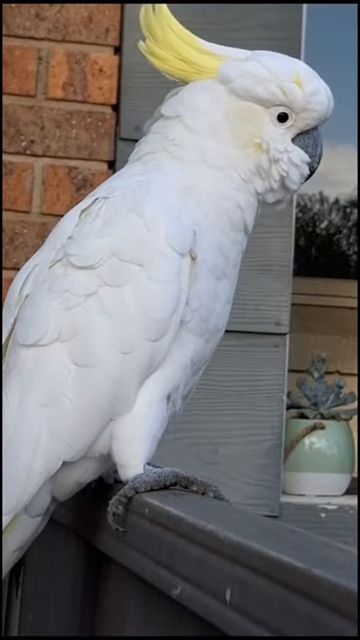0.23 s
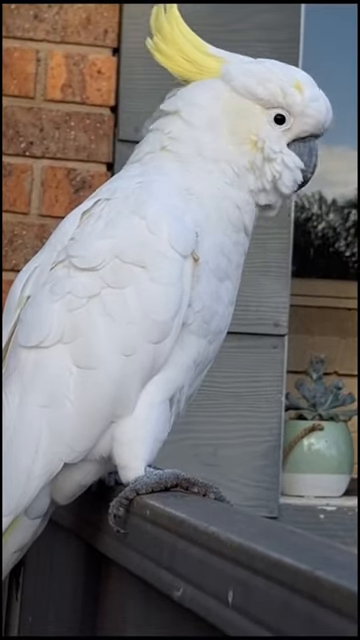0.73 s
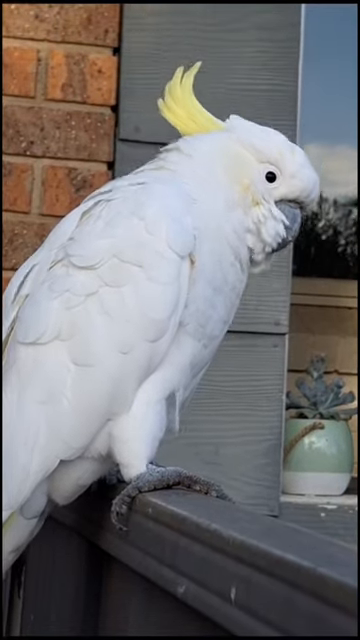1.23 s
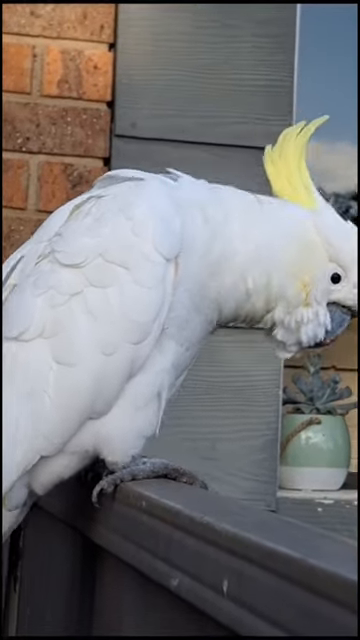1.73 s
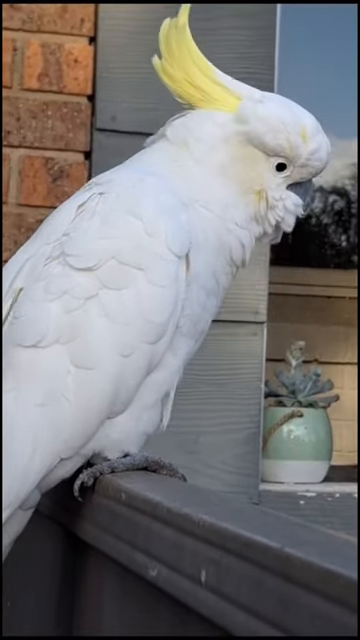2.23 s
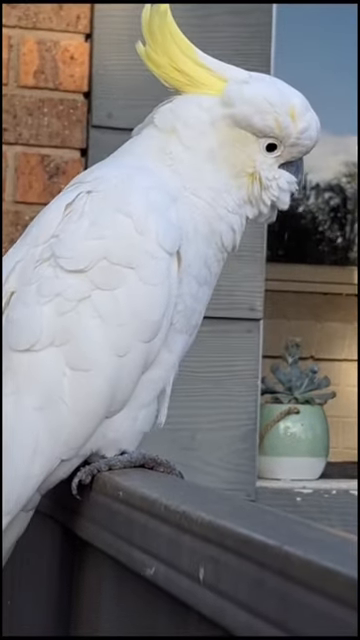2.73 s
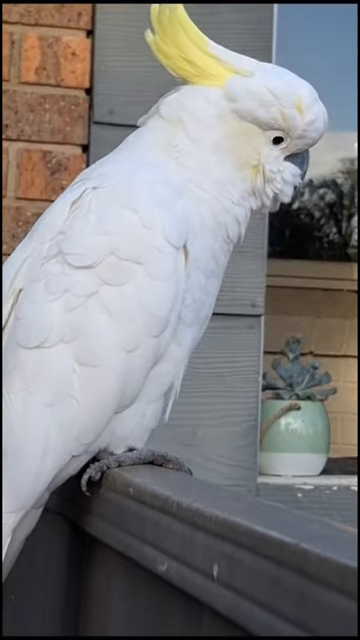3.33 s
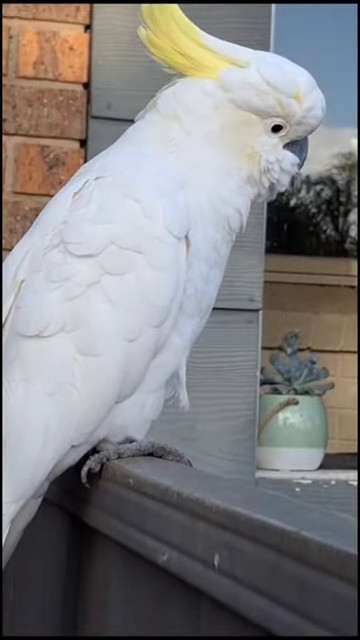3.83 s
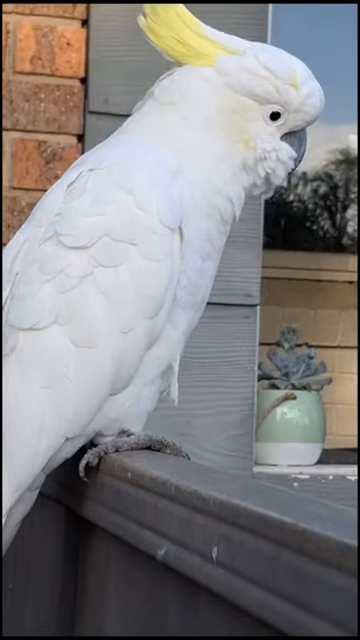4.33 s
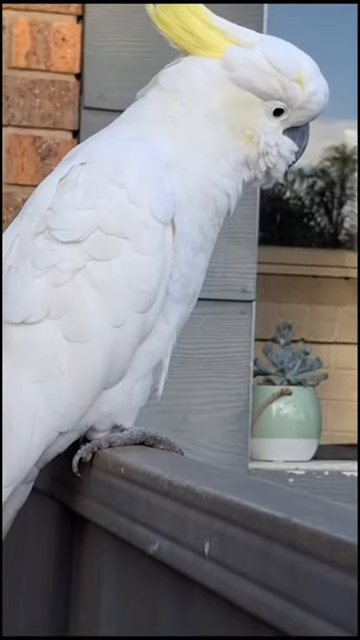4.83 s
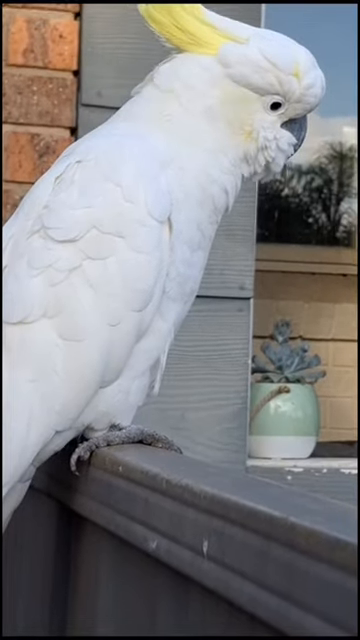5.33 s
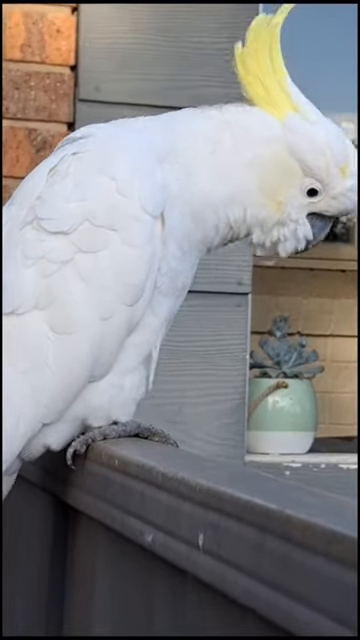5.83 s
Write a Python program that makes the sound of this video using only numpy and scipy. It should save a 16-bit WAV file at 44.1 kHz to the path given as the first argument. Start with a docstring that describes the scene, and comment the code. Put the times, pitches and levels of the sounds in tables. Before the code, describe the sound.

A perched cockatoo gives a faint croak and soft rasp, then a harsh creaking squawk and piercing arched cry over quiet traffic and breeze.

```python
"""A cockatoo on a rail beside a house croaks and rasps softly, then gives a loud creaking squawk and an arched cry.
Its syrinx is a pulse source, unsteady when rough, exciting throat resonances; the loud calls ring near 2.2 kHz.
Short wall echoes and a longer yard tail are noise decaying exponentially at a rate set by frequency.
Behind it, shaped noise makes traffic, breeze, hiss, bumps, rustles and a click; gliding tones make far birds
and a far engine."""
import sys
import numpy as np
from scipy import signal
from scipy.fft import rfft, irfft, next_fast_len
from scipy.io import wavfile
from scipy.ndimage import uniform_filter1d

SR = 44100
rng = np.random.default_rng(int(sys.argv[2]) if len(sys.argv) > 2 else 0)


def digitize_waveform(pressure):
    """Quantize a signal to 16-bit integers and store it at the path in sys.argv[1].

    Rows of a 2-D input are taken as channels; values are limited to [-1, 1].
    """
    field = np.atleast_2d(pressure).T
    bounded = np.clip(field, -1, 1)
    quanta = np.round(bounded * 32767).astype(np.int16)
    wavfile.write(sys.argv[1], SR, quanta)


N = 268701
TIME = np.arange(N) / SR  # seconds
TOP_HZ = 15500  # upper band limit

# Noise spectra of the background. Each row: frequency in Hz, relative level in dB per Hz.
BREEZE_SPECTRUM = [(12, -39), (20, -20.5), (44, -8.5), (64, 1.5), (119, -8), (176, -13), (200, -8.5),
                   (260, -42), (440, -120)]
TRAFFIC_SPECTRUM = [(65, -37), (110, -6), (176, -10.5), (235, -2), (324, -5.5), (404, -10), (439, -10),
                    (700, -14.5), (952, -14.5), (1240, -18), (3000, -25), (3900, -57), (6600, -120)]
HISS_SPECTRUM = [(1060, -19.5), (1800, -5.5), (3490, -2), (3920, -1), (4950, -1.5), (5810, -3.5),
                 (7950, -2.5), (9250, -7), (12300, -6.5), (15300, -13.5)]
# Slow drift of the breeze. Each row: time in seconds, mean level in dB.
BREEZE_LEVEL = [(0, -57), (1.5, -53), (1.95, -55.5), (2.3, -52), (3.05, -52.5), (3.45, -59.5), (4.4, -56),
                (5.4, -52), (6.09, -54)]
BREEZE_SWING_DB, BREEZE_RATE = 1.8, 7  # random unsteadiness, and its knots per second
# Slow drift of the traffic. Each row: time in seconds, mean level in dB.
TRAFFIC_LEVEL = [(0, -55.5), (.75, -56.5), (1, -53), (1.6, -52), (1.95, -54.5), (2.2, -51.5), (3.6, -52),
                 (4.4, -54.5), (6.09, -55)]
# Slow drift of the hiss. Each row: time in seconds, level in dB before a fixed gain in outdoors().
HISS_LEVEL = [(0.0, -63), (1.27, -57.5), (2.1, -58), (3.26, -57), (3.48, -59.5), (4.34, -63), (6.09, -62)]
# Coherence of diffuse noise at the two ports. Each row: frequency in Hz, left-right correlation (-1 to 1).
COHERENCE = [(60, 0.63), (150, 0.79), (380, 1), (940, 0.65), (2400, 0.27), (6000, 0.093), (15000, 0.055)]

# Gusts that bump the microphone. Each row: centre in seconds, level in dB.
GUSTS = [(.31, -51), (.885, -43.5), (1.2, -42), (1.275, -42), (2.27, -43.5), (3.74, -47), (6.03, -43)]
GUST_HZ, GUST_S = 60.4, 0.052
# Dull bumps. Each row: centre in seconds, level in dB, pitch in Hz, length in seconds.
BUMPS = [(1.285, -49, 230, .04), (3.7, -43.5, 201, .014), (3.712, -47.5, 750, .033),
         (3.735, -43, 120, .014), (4.03, -52, 250, .06), (4.75, -52, 270, .09)]
# Rustles of feathers and claws. Each row: centre in seconds, level in dB, length in seconds.
RUSTLES = [(.32, -59, .035), (1.198, -60, 0.12), (4.06, -57.5, 0.067), (4.701, -55, 0.055),
           (5.931, -53.5, 0.045)]
RUSTLE_HZ = 3700
# The click that opens the squawk. The one row: centre in seconds, level in dB, pitch in Hz, length in seconds.
TICK = (3, -34, 3199.5, .002)

# A far engine revs up, once in each gear.
# Each row: start in seconds, end in seconds, mean level in dB at the first pitch, first Hz, last Hz.
GEARS = [(2.0, 3.25, -53.5, 231, 270), (5.0, 5.75, -53, 210, 213)]
ENGINE_FADE_S, ENGINE_DB_PER_HZ = .3, .22  # it fades in and out, and grows louder as it revs

# Notes of far birds. Each row: centre in seconds, level in dB before flutter and the gains in scene(),
# mid-note pitch in Hz, length in seconds.
CHIRPS = [(4.12, -71, 2600, .05), (4.304, -65, 3150, .028), (4.374, -63.5, 3140, .03),
          (4.44, -71.5, 4140, .07), (4.495, -65, 3170, .035), (4.555, -69, 2800, .04),
          (5.856, -63, 5430, .025), (5.864, -61.5, 4340, .025), (5.915, -63, 4120, 0.041)]
CHIRP_FALL_HZ_PER_S = 1500

# Reverberation of the near wall and rail, and of the yard. Each row: frequency in Hz, 60 dB decay time in seconds.
WALL_DECAY = [(200, .04), (4000, 0.056)]
YARD_DECAY = [(200, 0.39), (2000, 0.2), (8000, 0.14)]

# Resonances of throat and beak. Each row: frequency in Hz, relative gain in dB.
CROAK_THROAT = [(150, -7), (650, -13.5), (900, -2), (1130, -20), (1400, -2.5), (1650, -18.5), (2100, -3.5),
                (2400, -1), (3000, -11), (3750, -22), (5100, -17), (5700, -26), (12000, -36)]
RASP_THROAT = [(150, -22), (400, -15.5), (680, -14), (890, 3), (1100, -9), (1350, -8.5), (1750, -14.5),
               (2200, 5), (2450, -5), (3150, -13), (3650, -24.5), (4200, -26), (4600, -27), (12000, -38)]
SQUAWK_THROAT = [(120, -36.5), (260, -23.5), (450, -22.5), (700, -11), (1000, -22.5), (1250, -18.5),
                 (1520, -17), (1800, -19.5), (2030, -5), (2280, 2.5), (2520, -7), (2900, -15.5),
                 (3450, -10.5), (4300, -20), (4500, -29), (5200, -43), (8000, -58)]
CRY_THROAT = [(200, -36.5), (450, -21.5), (900, -13.5), (1300, -16), (1650, -14), (1920, -5), (2200, 0),
              (2580, -6), (2850, -13), (3700, -12), (4280, -18), (4550, -28.5), (5000, -32), (5300, -48.5),
              (8000, -55)]
# What the opening beak adds in the middle of the rasp. Each row: frequency in Hz, gain in dB before GAPE_DB.
GAPE = [(900, -3.5), (1400, 4), (1830, 6.5), (2200, -4.5), (2750, 5), (3200, 2), (3560, 6), (3800, 2),
        (4150, 3), (4600, -1)]
GAPE_AT, GAPE_S, GAPE_DB = 1.483, .052, 4  # centre and length in seconds, overall gain
# The calls at the two ports. Each row: frequency in Hz, phase by which the left leads in radians.
BIRD_PHASE = [(100, 0), (1200, 0.56), (1620, 0.66), (1820, 1), (2200, 0.44), (2700, 1.24), (3300, 1.5),
              (4200, 1.63)]
# Each row: frequency in Hz, left minus right level in dB.
BIRD_BALANCE = [(200, -1), (700, -2.5), (1000, 2), (1300, -1.5), (1580, -5), (1780, 4.5), (2050, -4.5),
                (2400, -3), (2700, -4), (3500, -3), (4400, -1)]

# Croak, rasp, squawk, cry. Each row: start in seconds, end in seconds, nominal level in dB, attack in seconds,
# release in seconds, base roughness (0-1) at the onset, base roughness later in the call.
UTTERANCES = [(1.229, 1.309, -35, 0.042, 0.029, .7, .45), (1.38, 1.58, -34.4, 0.04, .016, .55, .68),
              (2.987, 3.11, -17.3, .07, .014, .85, 0.37), (3.219, 3.422, -19.3, 0.024, 0.029, 0.88, .1)]
SETTLE_S = .03  # roughness moves from its onset to its later value in about this time; the rasp grows rougher
# Pulse rate of each call; croak and squawk jump up at first, then run down; the cry is one arch.
# Each row: time in seconds, mean rate in Hz.
CROAK_PITCH = [(1.23, 199.7), (1.245, 300), (1.27, 290.3), (1.28, 134.6)]
RASP_PITCH = [(1.383, 400), (1.41, 428), (1.48, 480), (1.515, 478), (1.58, 410)]
SQUAWK_PITCH = [(2.99, 205), (3.01, 338), (3.03, 296), (3.055, 256), (3.078, 242.9), (3.092, 139.8)]
CRY_PITCH = [(3.225, 401.5), (3.263, 499.4), (3.291, 546.4), (3.305, 617.4), (3.331, 689.4), (3.361, 600.7),
             (3.377, 534.2), (3.385, 468.7), (3.405, 317), (3.416, 276.2)]
THIN_FROM_HZ, THIN_SPAN_HZ, THIN_DB = 513, 125, -5.5  # pushed high, the voice weakens in its upper partials
FRY_BELOW_HZ, FRY_ROUGH = 480, .5  # and it roughens as it sinks low
BREAK_AT, BREAK_S, BREAK_ROUGH, BREAK_DB = 3.312, .022, .4, -4  # the cry cracks once on its way up
BASS_EDGE_HZ, BASS_ATTACK_S, BASS_RELEASE_S = 1570, 0.024, .045  # the low partials have their own envelope
ROUND_THIN_DB, ROUND_BREAK_DB = 6.5, 8  # gain of the round fundamental in the thin voice and at the crack
ROUND_STOP_S, ROUND_FADE_S = .02, .015  # it stops this long before the call ends, and fades this fast


def amp(db):
    """Decibel law: a level in dB becomes an amplitude gain."""
    return 10 ** (np.asarray(db) / 20)


def unit(x):
    """Normalisation of power: x at rms 1."""
    return x / np.sqrt(np.mean(x ** 2) + 1e-20)


def ramp(x):
    """Linear onset with saturation: x held between 0 and 1."""
    return np.clip(x, 0, 1)


def swell(t, length):
    """Gaussian envelope round t = 0, down to exp(-2) at t = length."""
    return np.exp(-2 * (t / length) ** 2)


def along(points, hz):
    """Logarithmic frequency scale: (Hz, value) points interpolated along it."""
    f, v = np.transpose(points)
    return np.interp(np.log(hz + 1), np.log(f + 1), v)


def curves(rows):
    """Linear interpolation in time: one value per sample for each column after the time."""
    s, *cols = np.transpose(rows)
    return [np.interp(TIME, s, c) for c in cols]


def wobble(rate, size=N):
    """Band-limited fluctuation: a smooth random curve with rate knots a second."""
    knots = rng.standard_normal(size=2048)
    smooth = signal.resample(knots, 10 * len(knots))
    return np.interp(TIME[:size] * rate, np.arange(len(smooth)) / 10, smooth)


def filtered(x, response):
    """Linear filtering: the spectrum of x times a complex response of frequency."""
    m = next_fast_len(N + SR // 2)
    return irfft(rfft(x, m) * response(np.fft.rfftfreq(m, 1 / SR)), m)[..., :N]


def resonate(x, spectrum, size=4096):
    """Minimum-phase resonance: every pulse rings on after it strikes, never before."""
    cepstrum = irfft(np.log(amp(along(spectrum, np.fft.rfftfreq(size, 1 / SR)))))
    # folding the cepstrum makes the response causal
    cepstrum[1:size // 2] *= 2
    cepstrum[size // 2 + 1:] = 0
    return signal.fftconvolve(x, irfft(np.exp(rfft(cepstrum))))[:N]


def add(out, s, sound):
    """Superposition: mix a short sound into out, centred on s seconds."""
    first = round(s * SR) - sound.shape[-1] // 2
    part = out[..., first:first + sound.shape[-1]]
    part += sound[..., :part.shape[-1]]


def half_angle(hz):
    """Coherence as an angle: mixing mid and side by its cosine and sine gives the left-right correlation."""
    return np.arccos(np.clip(along(COHERENCE, hz), -1, 1)) / 2


def rush(spectrum, patchy_db, lag=0.00021):
    """Partly coherent noise of rms 1 with patches of random gain; it reaches the left port lag seconds early."""
    z = signal.stft(rng.standard_normal((2, N)), nperseg=512)[2]
    field = uniform_filter1d(rng.standard_normal(z.shape[1:]), size=6, axis=0)
    field = uniform_filter1d(field, size=14, axis=1)
    pair = signal.istft(z * amp(patchy_db * unit(field)), nperseg=512)[1][:, :N]

    def colour(hz):
        return amp(along(spectrum, hz)) * [np.cos(half_angle(hz)), np.sin(half_angle(hz))]

    mid, side = filtered(pair, colour)
    ports = np.array([mid + side, mid - side])
    return unit(filtered(ports, lambda hz: np.exp(1j * np.pi * lag * np.array([hz, -hz]))))


def puffs(rows, width, size=16384):
    """Band-limited noise bursts: a Gaussian swell round one pitch each; width in octaves."""
    out, t, hz = np.zeros((2, N)), TIME[:size] - TIME[size // 2], np.fft.rfftfreq(size, 1 / SR)
    for s, db, centre, length in rows:
        band = np.exp(-.5 * (np.log2((hz + 1) / centre) / width) ** 2)
        mid, side = irfft(rfft(rng.standard_normal((2, size))) * band)
        turn = half_angle(centre)
        ports = unit(np.cos(turn) * mid + np.sin(turn) * np.array([side, -side]))
        add(out, s, amp(db) * swell(t, length) * ports)
    return out


def outdoors(brighten=0.24):
    """Stationary noise slowly modulated: breeze on the microphone, far traffic and a fine hiss."""
    breeze_db, = curves(BREEZE_LEVEL)
    traffic_db, = curves(TRAFFIC_LEVEL)
    hiss_db, = curves(HISS_LEVEL)
    breeze = amp(breeze_db + BREEZE_SWING_DB * wobble(BREEZE_RATE)) * rush(BREEZE_SPECTRUM, patchy_db=0)
    gusts = puffs([(s, db, GUST_HZ, GUST_S) for s, db in GUSTS], width=.62)
    stir = wobble(8)  # the moving air sways traffic and hiss together
    traffic = amp(traffic_db + .7 * stir) * rush(TRAFFIC_SPECTRUM, patchy_db=2.0)
    hiss_gain = amp(hiss_db + 5.5 + .5 * stir + 0.298 * wobble(16))  # 5.5 dB is the fixed gain
    hiss = hiss_gain * rush(HISS_SPECTRUM, patchy_db=1.5)
    # the stronger the hiss, the brighter its top
    top = filtered(hiss, lambda hz: np.interp(hz, [7000, 12000], [0, 1]))
    hiss = hiss + (amp(brighten * (hiss_db - hiss_db.mean())) - 1) * top
    return breeze + gusts + traffic + hiss


def engine(waver_hz=2.5, waver_db=1.6):
    """Frequency modulation: one wavering tone that climbs ever faster through each gear."""
    out = np.zeros(N)
    for start, end, db, first, last in GEARS:
        climb = (last - first) * ramp((TIME - start) / (end - start)) ** 2
        fade = ramp(np.minimum(TIME - start, end - TIME) / ENGINE_FADE_S)
        level = amp(db + ENGINE_DB_PER_HZ * climb + waver_db * wobble(10)) * fade
        pitch = first + climb + waver_hz * wobble(25)
        out += level * np.sin(2 * np.pi * np.cumsum(pitch) / SR)
    return out


def far_birds(waver=0.0142, flutter_db=4.5, size=16384):
    """Falling glides: thin tones from the trees, with random flutter of pitch and level."""
    out, t = np.zeros(N), TIME[:size] - TIME[size // 2]
    for s, db, hz, length in CHIRPS:
        pitch = (hz - CHIRP_FALL_HZ_PER_S * t) * (1 + waver * wobble(250, size=size))
        level = amp(db + flutter_db * wobble(69.6, size=size)) * swell(t, length)
        add(out, s, level * np.sin(2 * np.pi * np.cumsum(pitch) / SR))
    return out


def small_sounds():
    """Transient noise: soft bumps, rustles of feathers and claws, and the click that opens the squawk."""
    rustles = [(s, db, RUSTLE_HZ, length) for s, db, length in RUSTLES]
    return puffs(BUMPS, width=0.51) + puffs(rustles, width=0.89) + puffs([TICK], width=.3)


def echo(x, decay):
    """Exponential reverberant decay: scattered reflections, different at each port, dying by frequency."""
    hz, t, z = signal.stft(rng.standard_normal((2, SR // 2)), SR, nperseg=128)
    tail = signal.istft(z * amp(-60 * t / along(decay, hz)[:, None]), SR, nperseg=128)[1]
    return signal.fftconvolve(x, tail / np.linalg.norm(tail[0]), axes=1)[:, :N]


def pulse_train(cycles, pitch, rough, jitter, scatter_db, limp_db, count=256):
    """Perturbed periodic excitation: one pulse per cycle, roughness unsettling its timing and size."""
    beats = np.searchsorted(cycles, np.arange(1, cycles[-1]))[:count]
    late, strong = np.clip(rng.standard_normal((count, 2))[:len(beats)], -2, 2).T * rough[beats]
    at = beats + jitter * late * SR / pitch[beats]
    # when rough, strong and weak pulses alternate
    limp = (-1) ** np.arange(len(beats)) * rough[beats]
    sizes = amp(scatter_db * strong + limp_db * limp) * np.sqrt(SR / pitch[beats])
    # sinc taps place each pulse between samples
    taps = at.astype(int)[:, None] + np.arange(-8, 9)
    weights = sizes[:, None] * np.sinc(taps - at[:, None])
    return np.bincount(taps.ravel(), weights.ravel(), N)


def syrinx(call, melody, throat, jitter, scatter_db, limp_db, air, flutter, round_db=-60):
    """Source and filter: pulses and leaking air ring the throat; roughness unsettles the pulses and adds air."""
    start, end, db, attack, release, onset_rough, later_rough = call
    pitch, = curves(melody)
    gate = 1. * ((TIME > start) & (TIME < end))

    def envelope(rise, fall):
        return amp(db) * ramp((TIME - start) / rise) * ramp((end - TIME) / fall)

    thin = ramp((pitch - THIN_FROM_HZ) / THIN_SPAN_HZ)
    crack = swell(TIME - BREAK_AT, BREAK_S)
    rough = later_rough + (onset_rough - later_rough) * np.exp(-((TIME - start) / SETTLE_S) ** 2)
    fry = FRY_ROUGH * ramp(1 - pitch / FRY_BELOW_HZ)
    rough = ramp(np.maximum(rough, fry) + BREAK_ROUGH * crack)
    cycles = np.cumsum(pitch * gate * (1 + flutter * rough * wobble(150))) / SR
    pulses = pulse_train(cycles, pitch, rough, jitter, scatter_db, limp_db)
    # air escapes in a puff each time the membranes open
    leak = air * rough * gate * unit(np.cos(np.pi * cycles) ** 4) * rng.standard_normal(N)
    # its turbulence is weak in the bass, so the lowest partials stay clear
    leak = signal.sosfilt(signal.butter(2, 1200 / (SR / 2), "high", output="sos"), leak)
    voice = resonate(pulses + leak, throat)
    # levelled by its running power, so the envelopes set the loudness
    power = np.abs(uniform_filter1d(uniform_filter1d(voice ** 2, size=600), size=400))
    voice = amp(BREAK_DB * crack) * voice / np.sqrt(power + power.max() / 100)
    bass = filtered(voice, lambda hz: 1 / (1 + (hz / BASS_EDGE_HZ) ** 8))
    # the round lowest tone is locked to the cycles of the pulses
    round_gain = amp(round_db + ROUND_THIN_DB * thin + ROUND_BREAK_DB * crack)
    fundamental = round_gain * np.sqrt(2) * np.cos(2 * np.pi * cycles)
    fundamental = fundamental * ramp((end - ROUND_STOP_S - TIME) / ROUND_FADE_S)
    low = envelope(BASS_ATTACK_S, BASS_RELEASE_S) * (bass + fundamental)
    high = envelope(attack, release) * amp(THIN_DB * thin) * (voice - bass)
    return low + high


def cockatoo():
    """Interaural-style differences: four calls given level and phase offsets between the two ports."""
    croak, rasp, squawk, cry = UTTERANCES
    # jitter is in cycles, scatter and limp in dB, flutter in fractions of the pitch, all at full roughness
    croak = syrinx(croak, CROAK_PITCH, CROAK_THROAT,
                   jitter=0.118, scatter_db=3.5, limp_db=0, air=1.2, flutter=.08)
    rasp = syrinx(rasp, RASP_PITCH, RASP_THROAT,
                  jitter=.065, scatter_db=3.0, limp_db=0.5, air=2.0, flutter=.075)
    gape = swell(TIME - GAPE_AT, GAPE_S)
    rasp = (1 - gape) * rasp + gape * amp(GAPE_DB) * resonate(rasp, GAPE)
    squawk = syrinx(squawk, SQUAWK_PITCH, SQUAWK_THROAT,
                    jitter=.14, scatter_db=6.5, limp_db=1.5, air=.55, flutter=.17, round_db=-22.5)
    cry = syrinx(cry, CRY_PITCH, CRY_THROAT,
                 jitter=0.083, scatter_db=6.0, limp_db=1, air=.8, flutter=.06, round_db=-22)
    sides = np.array([[.5], [-.5]])  # half of each difference goes to each port

    def ports(hz):
        return amp(sides * along(BIRD_BALANCE, hz)) * np.exp(1j * sides * along(BIRD_PHASE, hz))

    return filtered(croak + rasp + squawk + cry, ports)


def scene():
    """Superposition of direct and reverberant sound: the near bird, its echoes and the garden behind."""
    notes = far_birds() * np.ones((2, 1))
    far = amp(7.0) * notes + amp(8.0) * echo(notes, YARD_DECAY)
    bird = cockatoo()
    echoes = amp(-9.5) * echo(bird, WALL_DECAY) + amp(-19.5) * echo(bird, YARD_DECAY)
    return outdoors() + engine() + far + small_sounds() + echoes + bird


def record(dry):
    """Band limitation: only components below TOP_HZ are kept."""
    return filtered(dry, lambda hz: hz < TOP_HZ)


dry = scene()
out = record(dry)
digitize_waveform(out)
```